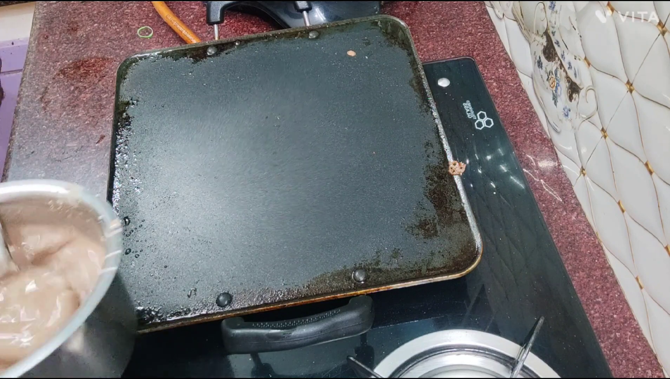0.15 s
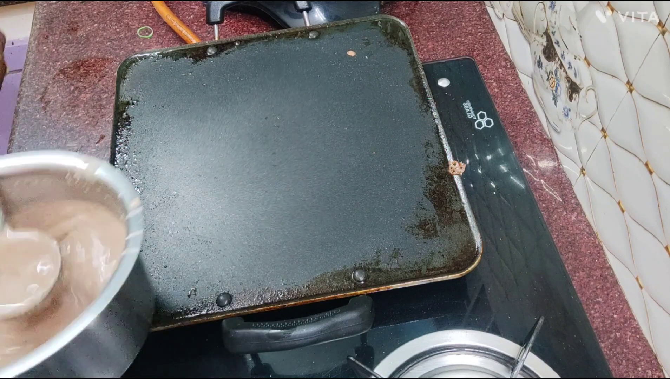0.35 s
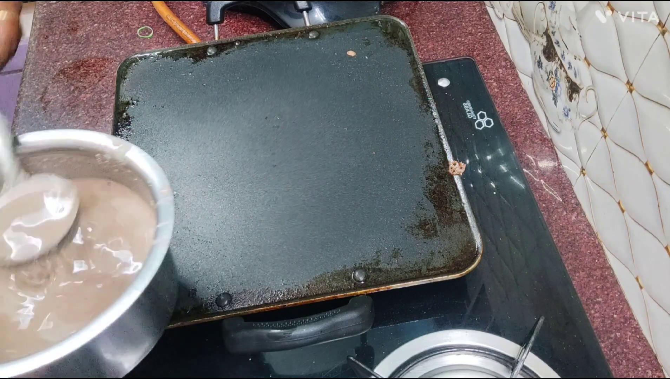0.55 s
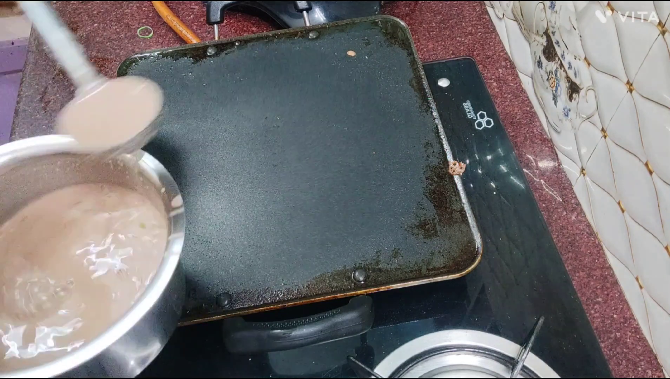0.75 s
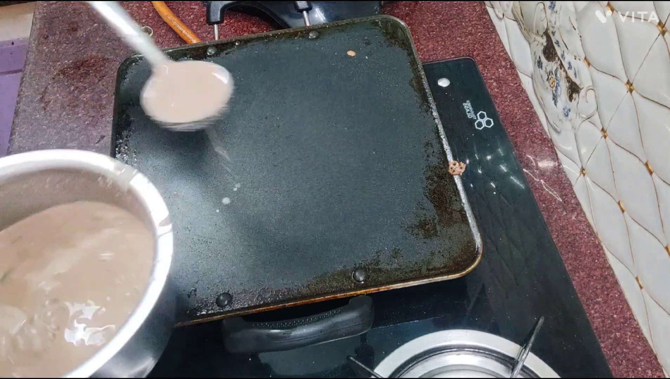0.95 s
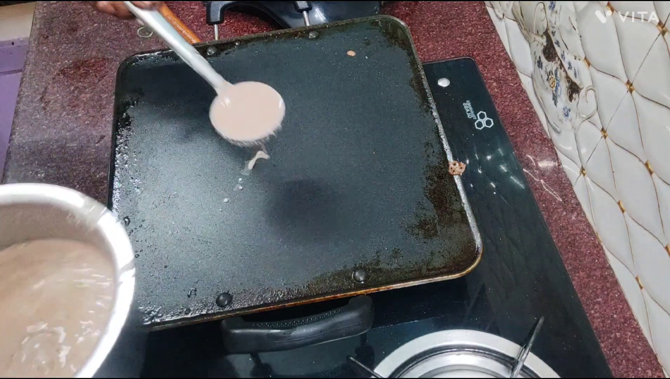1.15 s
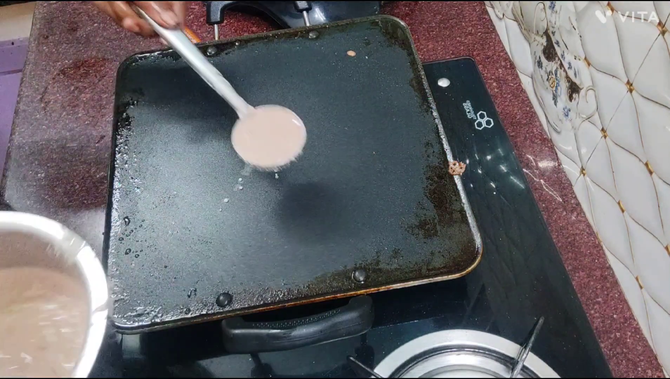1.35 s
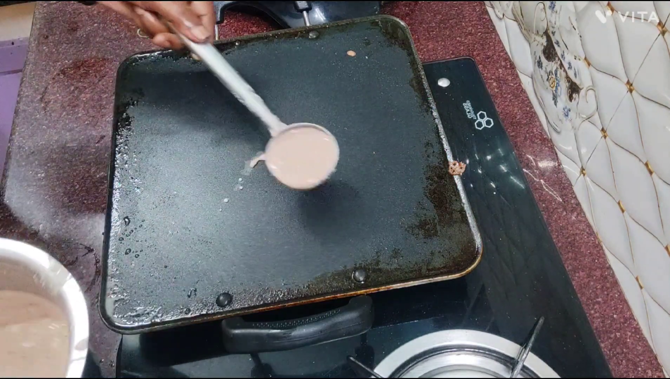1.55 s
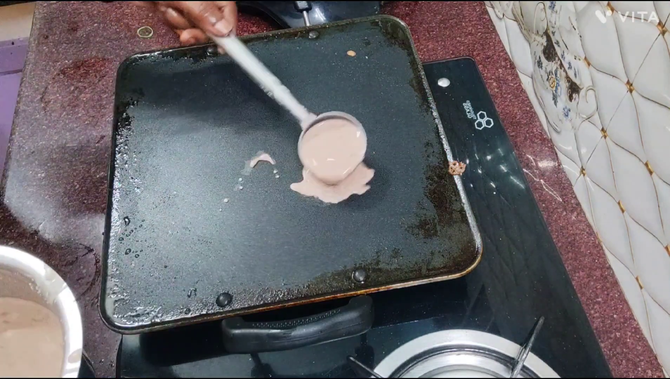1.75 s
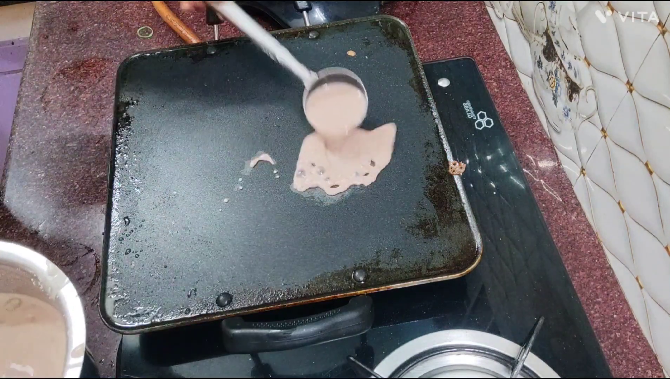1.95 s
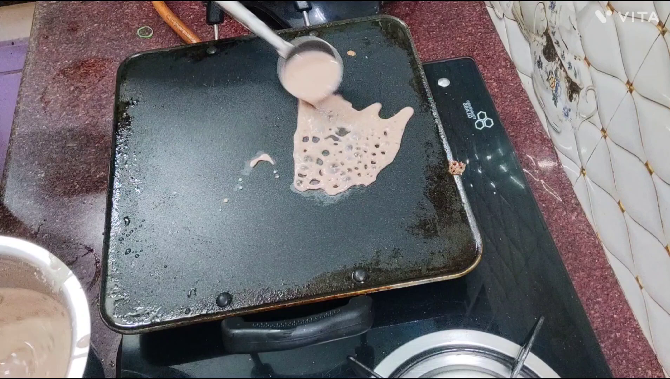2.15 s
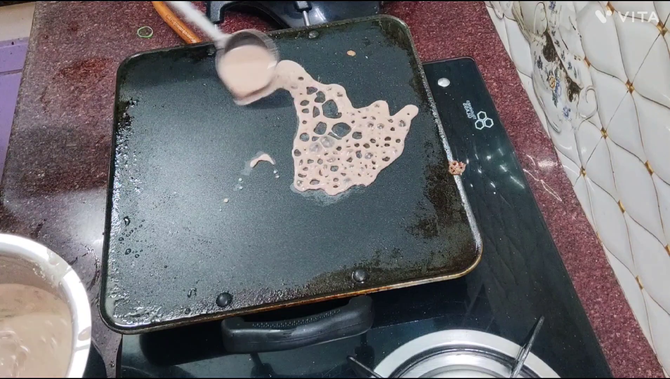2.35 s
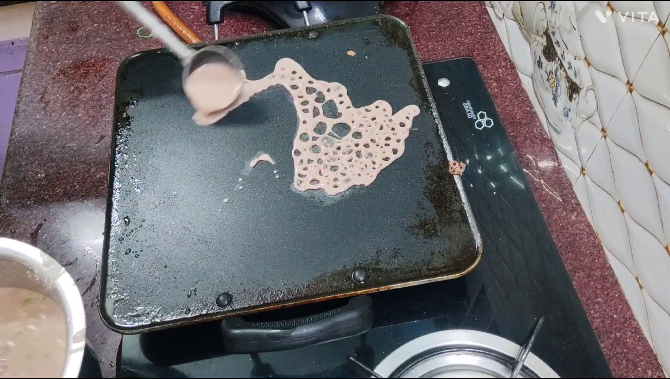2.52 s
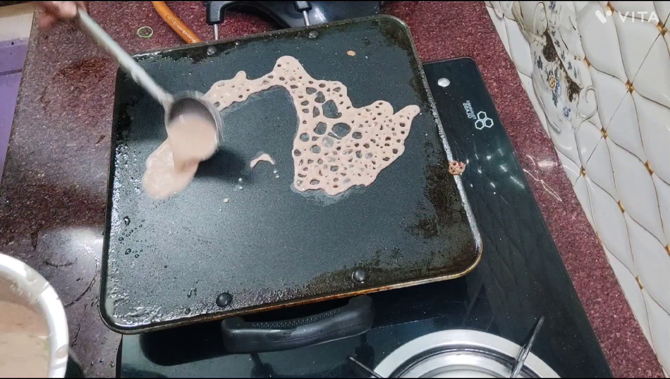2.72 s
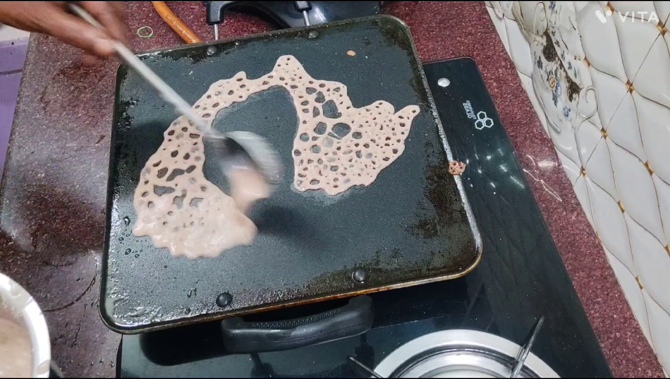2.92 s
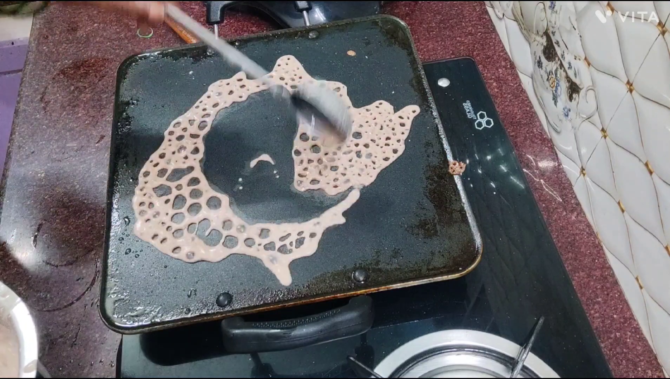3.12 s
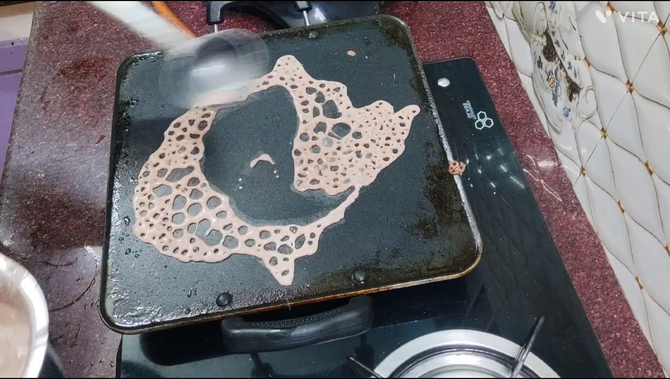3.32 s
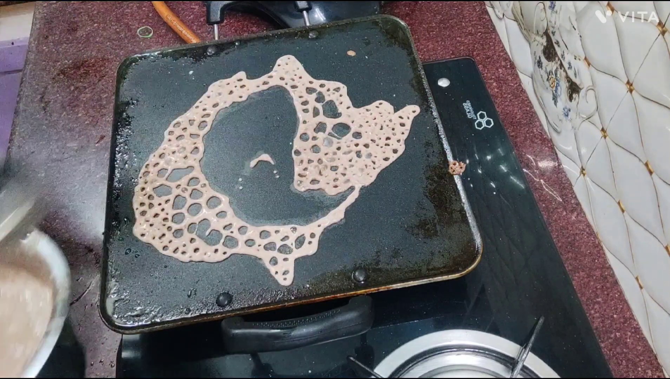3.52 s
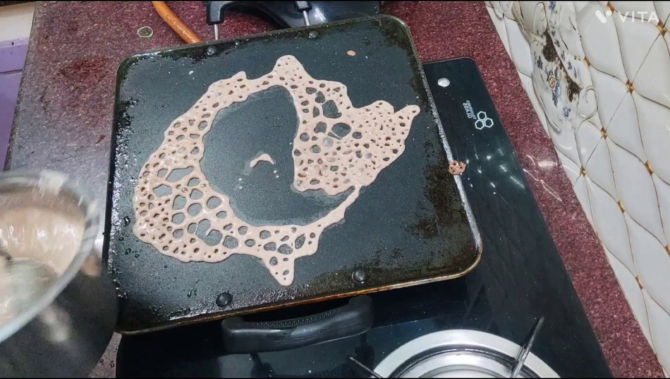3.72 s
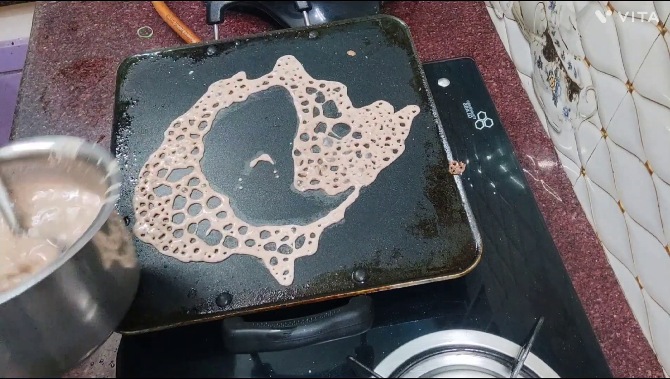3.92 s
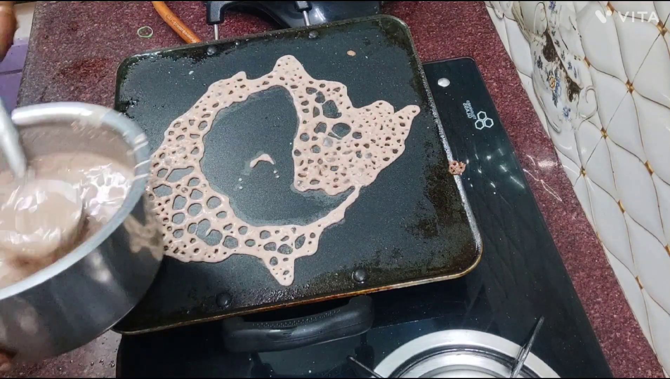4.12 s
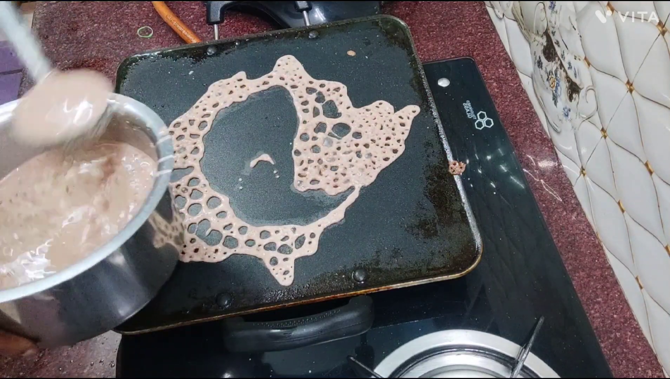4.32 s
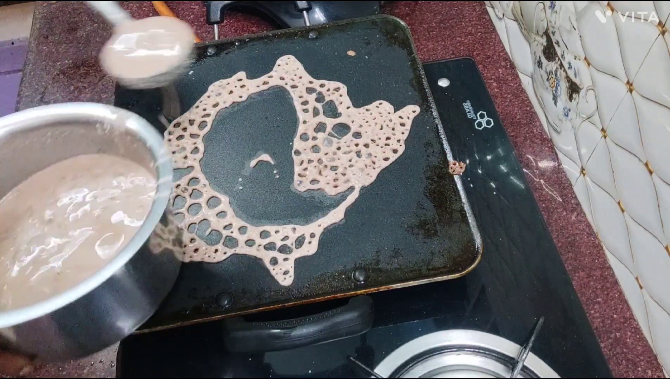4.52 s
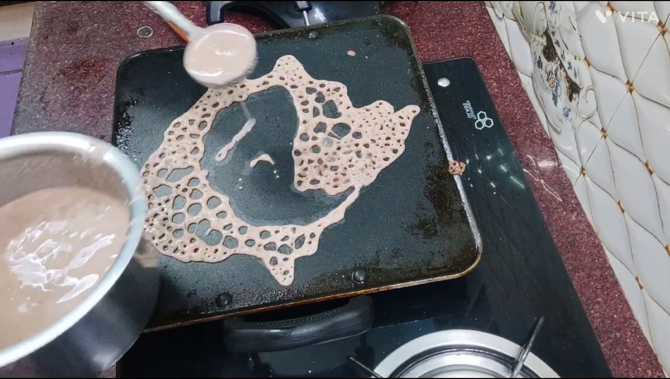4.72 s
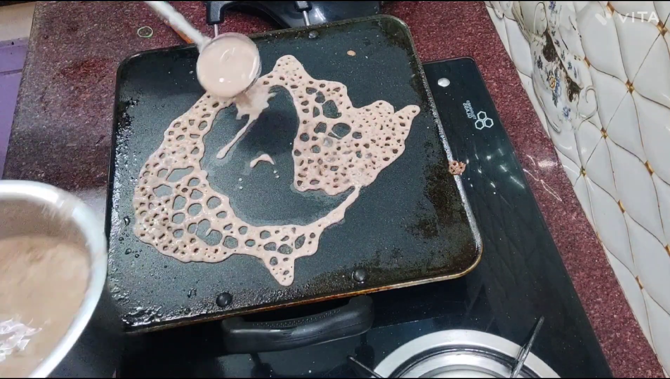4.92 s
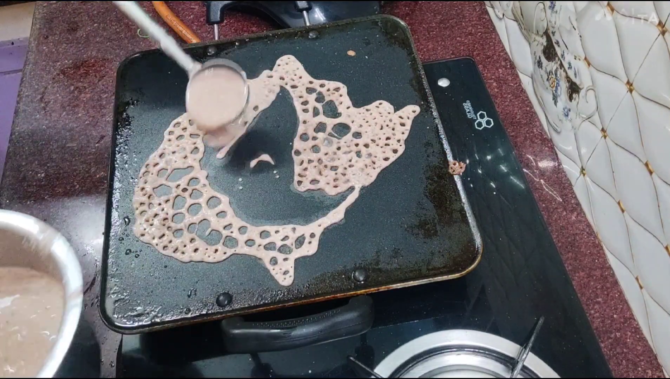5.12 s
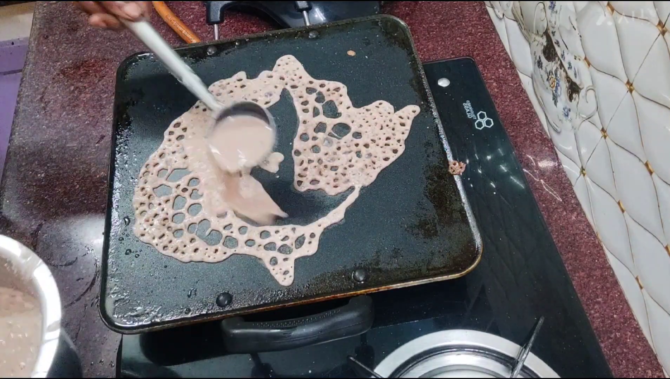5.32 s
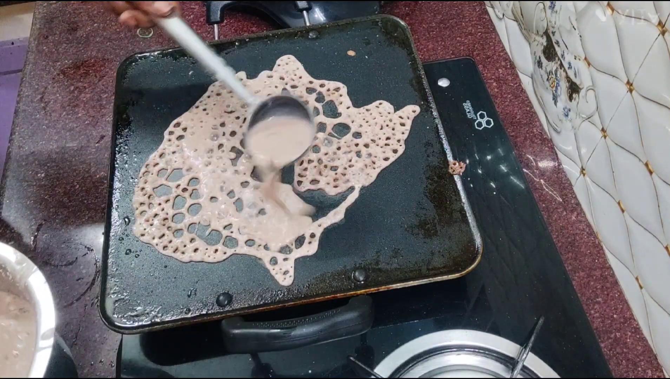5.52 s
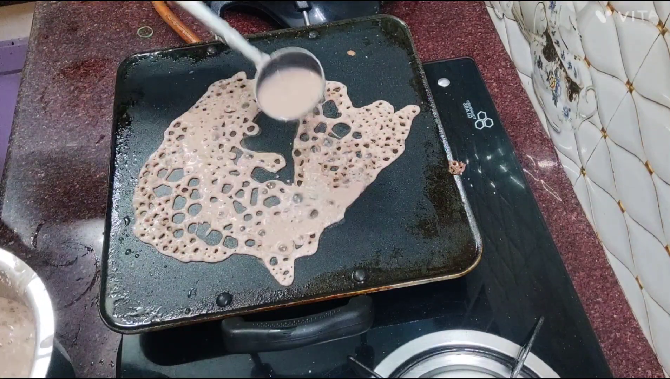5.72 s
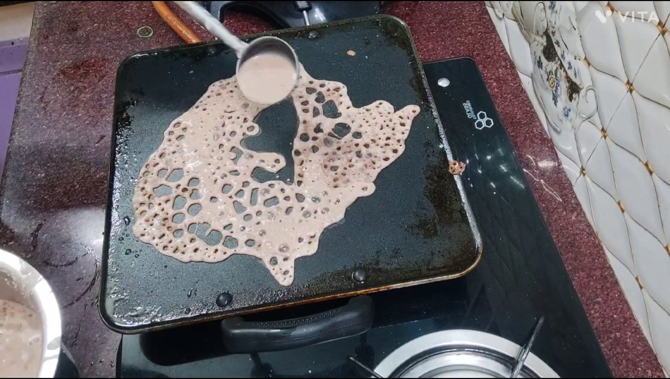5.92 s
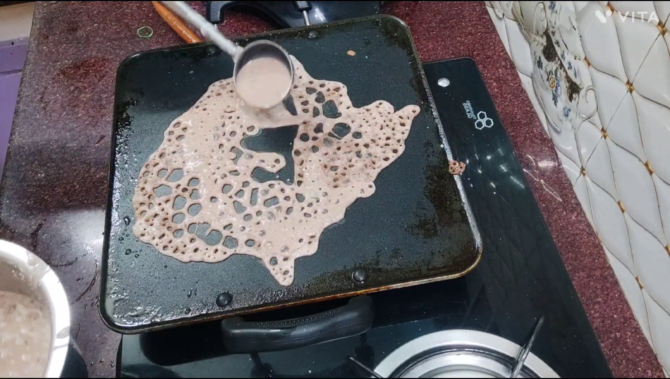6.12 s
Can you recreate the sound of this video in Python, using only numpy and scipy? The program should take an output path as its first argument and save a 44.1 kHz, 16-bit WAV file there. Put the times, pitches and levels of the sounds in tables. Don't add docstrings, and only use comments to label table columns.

```python
import sys
import numpy as np
from scipy import signal
from scipy.fft import rfft, irfft, next_fast_len
from scipy.io import wavfile
from scipy.ndimage import uniform_filter1d, map_coordinates

SR = 44100
rng = np.random.default_rng(int(sys.argv[2]) if len(sys.argv) > 2 else 0)


def wav_record(signal):
    frames = np.transpose(np.atleast_2d(signal))
    bounded = np.clip(frames, -1, 1)
    quanta = np.round(bounded * 32767).astype(np.int16)
    wavfile.write(sys.argv[1], SR, quanta)


def makeup_ratio(level_db):
    decades = np.asarray(level_db, float) / 20
    return 10 ** decades


N = 276066

# start in seconds, length in seconds, flow level in dB,
# wetness (boil over fizz) in dB, left-right difference in dB.
POURS = [(1.192, 0.045, -34.5, -16.5, -10), (1.22, 0.38, -38, -18, -3), (1.7, 0.17, -39, -14.5, -8),
         (1.906, 0.033, -25, -12.5, -8), (1.987, 0.4, -27, -12, -7), (2.283, 0.43, -23.5, -12, -7.5),
         (2.66, 0.84, -20.5, -15.5, -5.5), (3.1, 0.15, -17.5, -14, -4), (3.34, 0.29, -23.5, -54, -4.5),
         (4.804, 0.36, -33, -20.5, -5.5), (5.207, 0.88, -33, -10.5, -3.5), (5.486, 0.31, -29, -15, -4),
         (5.908, .4, -31.5, -15.5, -9)]
# frequency in Hz, level in dB.
FIZZ = [(800, -24), (2500, -38.5), (5000, -6.5), (7000, -4.5), (9500, -2.5), (10500, -6.5), (12000, -5),
        (15500, 0)]
# frequency in Hz, level in dB.
BOIL = [(300, -26), (700, -11), (1300, -6.5), (2300, -0.5), (3500, -3), (5000, -4), (8000, -7),
        (12000, -41)]


def unit(x):
    return x / np.sqrt(np.mean(x ** 2) + 1e-20)


def along(points, hz):
    f, v = np.transpose(points)
    return np.interp(np.log(hz + 1), np.log(f + 1), v)


def wobble(rate):
    knots = rng.standard_normal(int(N * rate / SR) + 4)
    return map_coordinates(knots, [np.arange(N) * rate / SR])


def filtered(x, response):
    m = next_fast_len(N + SR // 2)
    return irfft(rfft(x, m) * response(np.fft.rfftfreq(m, 1 / SR)), m)[..., :N]


def causal(spectrum):
    def response(hz):
        cepstrum = irfft(np.log(makeup_ratio(along(spectrum, hz))))
        half = len(cepstrum) // 2
        cepstrum[1:half] *= 2
        cepstrum[half + 1:] = 0
        return np.exp(rfft(cepstrum))
    return response


def panned(db):
    return np.array([makeup_ratio(db / 2), makeup_ratio(-db / 2)])


def patches(dies_s, level_db):
    simmer_s, simmer_share = 0.96, 0.029
    start, length = np.transpose(POURS)[:2, :, None]
    age = np.clip(np.arange(N) / SR - start, 0, None)
    fed = np.minimum(age, length)

    def grow(tau):
        return (1 - np.exp(-fed / tau)) * np.exp((fed - age) / tau)

    power = grow(dies_s) + simmer_share * simmer_s / dies_s * grow(simmer_s)
    return makeup_ratio(2 * level_db)[:, None] * power


def bursts(count, spread_db, lag, hiss, lead=0):
    where, size, sign, place, lean = rng.random((count, 5)).T
    gain = makeup_ratio(-spread_db * np.log(size + 0.0046)) * np.sign(sign - 0.5) * panned(12 * (lean - 0.5))
    at = where * (N - 60) + 30
    delay = lead + lag * (place - 0.5)
    clicks = [np.bincount((at + side * delay).astype(int), g, N) for side, g in zip((1, -1), gain)]
    return unit(unit(np.array(clicks)) + hiss * rng.standard_normal((2, N)))


def sizzle():
    flow_db, wet_db, side_db = np.transpose(POURS)[2:]
    small = patches(0.16, flow_db)
    large = patches(0.17, flow_db + wet_db).sum(0)
    small_sum = small.sum(0)
    pan_db = side_db @ small / (small_sum + 1e-20) - wobble(5.5)
    flare_db = 0.55 * wobble(11) + 0.6 * wobble(25) + 0.95 * wobble(70)
    swell_db = 0.16 * wobble(25)
    fizz = unit(filtered(bursts(count=60000, spread_db=-0.5, lag=9, hiss=0.51, lead=2.2), causal(FIZZ)))
    boil = unit(filtered(bursts(count=20000, spread_db=1.0, lag=5, hiss=1.65, lead=2.4), causal(BOIL)))
    fizz *= np.sqrt(small_sum) * makeup_ratio(-9.5 + flare_db + swell_db) * panned(0.74 * pan_db - 2.5)
    boil *= np.sqrt(large) * makeup_ratio(0.5 + 0.52 * flare_db) * panned(0.12 * pan_db)
    return fizz + boil


def spits():
    # time in seconds, peak level in dB, body level in dB, left-right difference in dB.
    spit_rows = [(1.552, -13.5, -21.5, -9), (1.646, -23, -23, -16), (1.688, -15, -19, -6),
                 (1.766, -28, -9, -6), (1.8445, -10, -21, -1), (1.908, -23, -32, -3),
                 (2.2247, -35, -19, -7.5), (2.882, -18, -23, 1), (3.666, -32, -46, -14),
                 (3.9308, -24, -35, -8), (4.0665, -23, -28, -19), (4.2601, -23, -21, -9),
                 (4.321, -25, -30.5, -2), (4.529, -24, -30, -24), (4.8986, -12.5, -21.5, -8.5),
                 (5.0825, -17.5, -59, 5), (5.2191, -17, -35, -8), (5.5616, -13, -15, 0),
                 (5.9894, -6, -27, -8)]
    crack, body = np.zeros((2, 2, N + SR))
    t = np.arange(SR // 20) / SR
    for s, db, body_db, pan_db in spit_rows:
        grit = rng.standard_normal((3, len(t)))
        decay = makeup_ratio(-60 * t / 0.008) + 0.12 * makeup_ratio(-60 * t / 0.04)
        spray = (0.8 * grit[0] + 0.6 * grit[1:] + 2.5 * (t == 0)) * decay
        spray = panned(pan_db)[:, None] * spray
        span = slice(round(s * SR), round(s * SR) + len(t))
        crack[:, span] += makeup_ratio(db - 8.5) * spray
        body[:, span] += makeup_ratio(db + body_db - 1.5) * spray
    bright = filtered(crack[:, :N], lambda hz: causal(FIZZ)(hz) / (1 + 1j * hz / 9000) ** 2)
    return bright + filtered(body[:, :N], causal(BOIL))


def ladle():
    # time in seconds, level in dB.
    stir = [
        (0.3, -65),
        (0.33, -59),
        (0.39, -46),
        (0.456, -67),
        (0.464, -50),
        (0.478, -71),
        (0.502, -61),
        (0.6, -85),
    ]
    # time in seconds, peak level in dB, ring level in dB, left-right in dB.
    ticks = [
        (0.0095, -35.5, -44, -11),
        (0.093, -50, 0, -5),
        (0.1945, -40, -1.5, -10),
        (0.2074, -44, -9, -6),
        (0.2906, -26.5, -21.5, -0.5),
        (0.384, -35, -22, -14),
        (0.4629, -38, -14, -2),
        (0.5062, -43, -20, -1),
        (0.667, -47, -30, -5.0),
    ]
    # frequency in Hz, level in dB, 60 dB decay time in seconds.
    pot = [(3420, 1, 0.028), (3560, -3, .03), (4000, -18, .03), (5020, -4.5, 0.012)]
    contact_db = [(1000, -8), (3000, 4.0), (9000, -3), (11000, -5), (13000, -10), (16000, -12)]
    contact, ring = np.zeros((2, N + SR)), np.zeros(N + SR)
    t = np.arange(SR // 8) / SR
    for s, db, ring_db, pan_db in ticks:
        span = slice(round(s * SR), round(s * SR) + len(t))
        noise = rng.standard_normal((2, len(t)))
        contact[:, span] += makeup_ratio(db - 10.0 - 60 * t / 0.014) * panned(pan_db)[:, None] * noise
        modes = 0
        for hz, level, t60 in pot:
            modes = modes + makeup_ratio(level + rng.normal(0, 4.3) - 60 * t / t60) * np.sin(2 * np.pi * hz * t)
        ring[span] += makeup_ratio(db + ring_db - 6) * modes
    s, db = np.transpose(stir)
    slide_db = np.interp(np.arange(N) / SR, s, db, left=-120, right=-120)
    slide = makeup_ratio(slide_db - 6.0) * bursts(count=40000, spread_db=3, lag=5.5, hiss=1.2)
    return filtered(contact[:, :N] + slide, causal(contact_db)) + ring[:N]


def plops():
    # time in seconds, level in dB, start pitch in Hz, end pitch in Hz, life in seconds.
    pockets = [
        (.478, -41, 720, 1060, .032),
        (4.023, -48, 830, 600, .011),
        (4.036, -51, 545, 570, .035),
    ]
    # time in seconds, level in dB, frequency in Hz.
    bump = (2.104, -37, 62)
    out, t = np.zeros(N), np.arange(N) / SR
    for s, db, start_hz, end_hz, life in pockets:
        u = np.clip((t - s) / life, 0, 3)
        shape = (1 - np.exp(-u / 0.017)) / (1 + (u / 0.83) ** 6)
        pitch = start_hz + (end_hz - start_hz) * u ** 2 / (1 + 0.2 * u ** 2)
        out += makeup_ratio(db) * shape * np.sin(2 * np.pi * np.cumsum(pitch) / SR)
    s, db, hz = bump
    u = np.clip(t - s, 0, 1) * hz * 2 * np.pi
    push = makeup_ratio(db) * u * (2 - u) * np.exp(-u)
    return out * panned(2.8)[:, None] - push


def kitchen(x):
    # frequency in Hz, 60 dB decay time in seconds.
    walls = [(500, 0.063), (3000, 0.89), (10000, 0.085)]
    hz, t, z = signal.stft(rng.standard_normal((2, SR // 3)), SR, nperseg=256)
    decay = makeup_ratio(-60 * t / along(walls, hz)[:, None])
    tail = signal.istft(z * decay, SR, nperseg=256)[1]
    late = np.pad(x, ((0, 0), (150, 0)))
    return signal.fftconvolve(late, tail / np.linalg.norm(tail[0]), axes=1)[:, :N]


def drone():
    # frequency in Hz, level in dB per Hz.
    roar = [(12, -34), (20, -1.5), (69, -15), (142, -4.5), (202, -9.5), (652, -9.5), (848, -12),
            (911, -9.5), (1730, -16), (1860, -20), (2100, -19.5), (4510, -35.5), (6000, -38), (7800, -73),
            (13200, -120)]
    # frequency in Hz, width in Hz, level in dB.
    hums = [(141.4, 7.3, 6), (260.7, 49, 7), (323.3, 9.5, 7.5)]
    # frequency in Hz, correlation from -1 to 1.
    alike = [(60, -0.007), (130, 1), (290, 0.39), (640, 0.37), (1410, -0.5), (3100, 0.25), (6820, -0.88),
             (15000, 0.79)]
    # frequency in Hz, left-right difference in dB.
    balance = [(60, 3), (150, 4), (380, 5), (950, 4.5), (2380, -1), (5980, 2), (15000, 1.5)]
    gas_db = [(2000, -42), (6000, 2), (9300, -5.5), (10500, -7.5), (13000, 0), (14000, -21)]

    def mid_side(hz):
        peaks = sum(db / (1 + (2 * (hz - c) / w) ** 2) for c, w, db in hums)
        angle = np.arccos(np.clip(along(alike, hz), -1, 1)) / 2
        return makeup_ratio(along(roar, hz) + peaks) * np.array([np.cos(angle), np.sin(angle)])

    mid, side = filtered(rng.standard_normal((2, N)), mid_side)
    pair = filtered(np.array([mid + side, mid - side]), lambda hz: panned(along(balance, hz)))
    gas = filtered(rng.standard_normal((2, N)), lambda hz: makeup_ratio(along(gas_db, hz)))
    gas *= makeup_ratio(-69 + 0.67 * wobble(4.3)) * panned(-4)[:, None]
    return makeup_ratio(-50.5 + 0.14 * wobble(4.5)) * unit(pair) + gas


def through_ports(x):
    # resonance in Hz, width in Hz.
    ports = [(8880, 710), (7667, 866)]

    def ring(hz):
        return np.array([c * c / (c * c - hz * hz + 1j * hz * w) for c, w in ports])

    heard = filtered(x, ring)
    return heard + makeup_ratio(-26) * heard[::-1]


def thrifty(x):
    # frequency in Hz, chance of mono from 0 to 1, share of strips shut from 0 to 1.
    thrift = [(2200, 0, 0), (3400, .04, .22), (4700, .02, .24), (6600, .1, 0), (8200, .3, .02),
              (8300, .8, .03), (9500, .8, .1), (10000, .6, .32), (11500, .85, .4), (15300, .6, .36)]
    hz, t, z = signal.stft(x, SR, nperseg=1024, noverlap=768)
    f, mono, share = np.transpose(thrift)

    def luck(width_hz, spell):
        band = (hz / width_hz).astype(int)
        step = (t / spell + rng.random(band[-1] + 1)[band, None]).astype(int)
        return rng.random((band[-1] + 1, step.max() + 1))[band[:, None], step]

    strip_luck = np.where((hz > 9500)[:, None], luck(230, 0.045), luck(90, 0.045))
    shut = np.interp(hz, f, share)[:, None]
    z *= (strip_luck >= shut) / np.sqrt(1 - shut) * (hz < 15520)[:, None]
    power = uniform_filter1d(np.abs(z) ** 2, size=16, axis=1)
    power = np.abs(uniform_filter1d(power, size=5, axis=2))
    flip_luck = np.where((hz < 9660)[:, None], luck(1380, 0.023), luck(690, 0.04))
    flip = np.where((flip_luck < 0.21) & (hz > 8270)[:, None], -1, 1)
    level = np.sqrt(power / (power.sum(0) + 1e-30))
    joint = (z[0] + flip * z[1]) * level * np.array([np.ones_like(flip), flip])
    z = np.where(luck(690, 0.06) < np.interp(hz, f, mono)[:, None], joint, z)
    return signal.istft(z, SR, nperseg=1024, noverlap=768)[1][:, :N]


def scene():
    knocks = spits() + ladle() + plops()
    return sizzle() + knocks + makeup_ratio(-6.5) * kitchen(knocks) + drone()


def low_pass(x):
    return signal.sosfilt(signal.butter(12, 16460, fs=SR, output="sos"), x)


def record(dry):
    mix = thrifty(through_ports(dry))
    return low_pass(mix)


dry = scene()
out = record(dry)
wav_record(out)
```